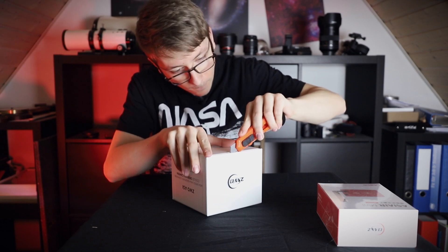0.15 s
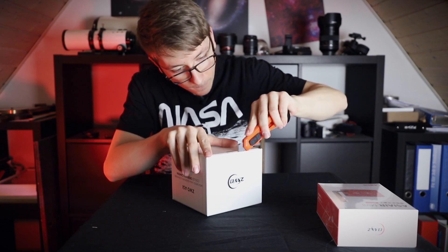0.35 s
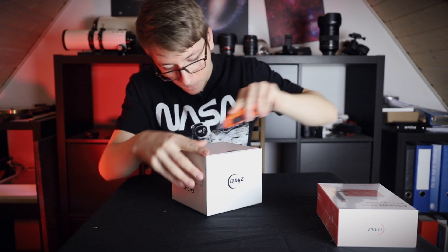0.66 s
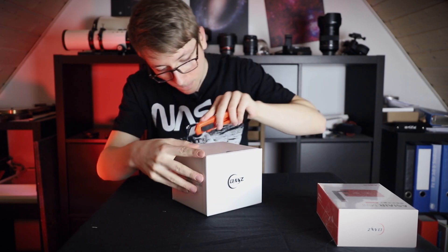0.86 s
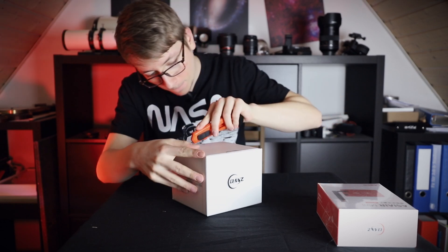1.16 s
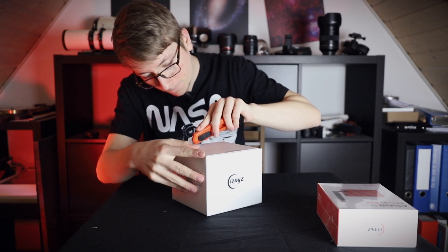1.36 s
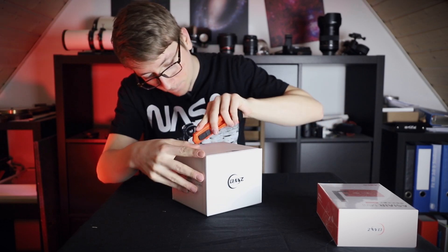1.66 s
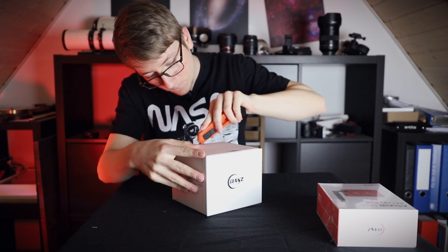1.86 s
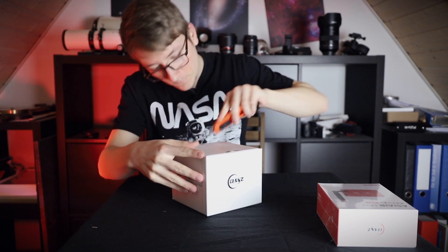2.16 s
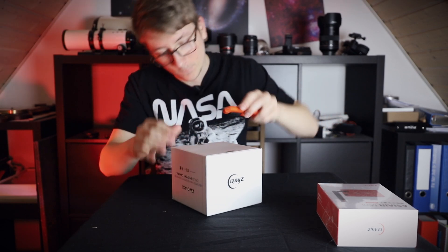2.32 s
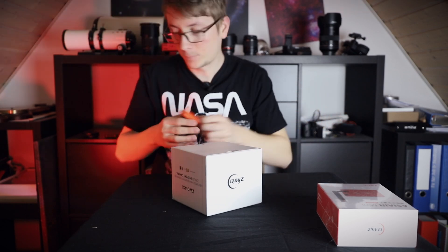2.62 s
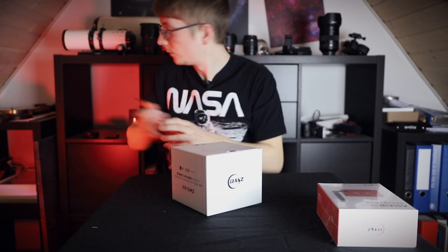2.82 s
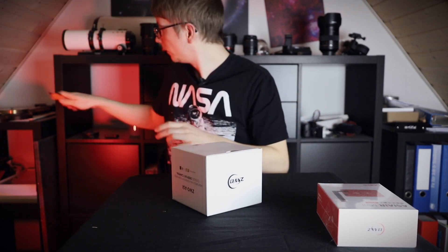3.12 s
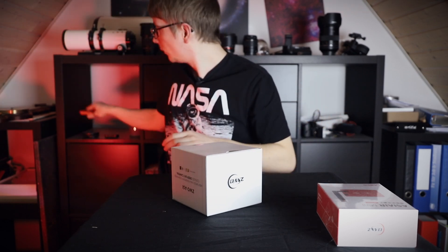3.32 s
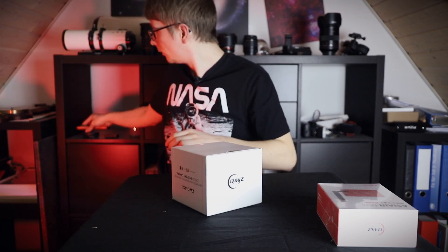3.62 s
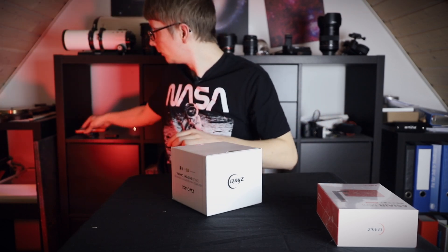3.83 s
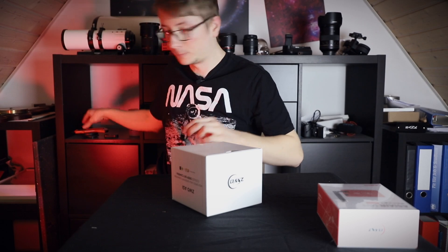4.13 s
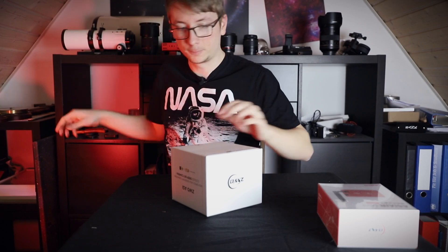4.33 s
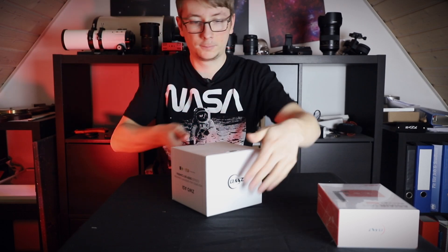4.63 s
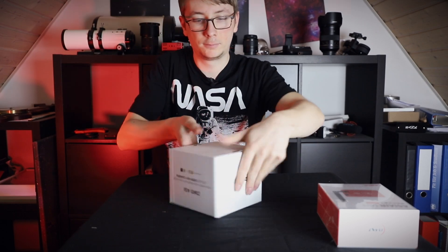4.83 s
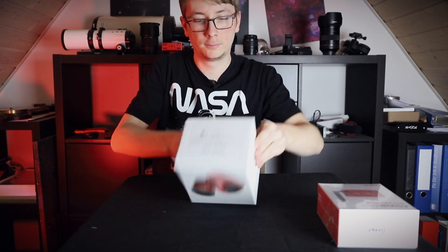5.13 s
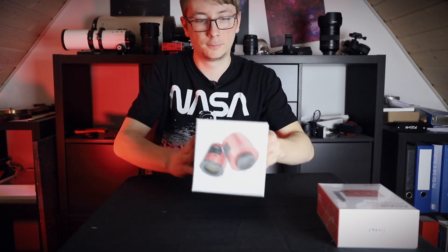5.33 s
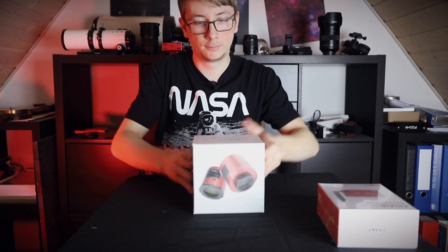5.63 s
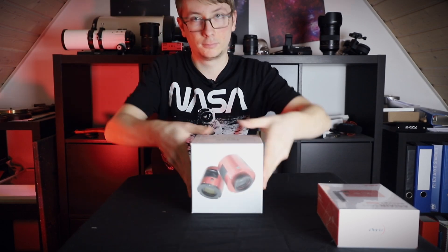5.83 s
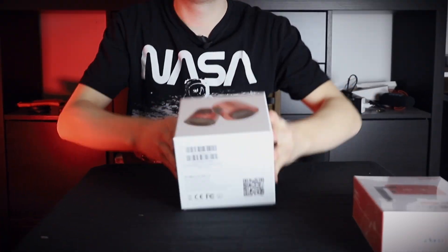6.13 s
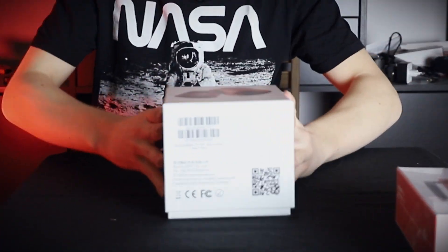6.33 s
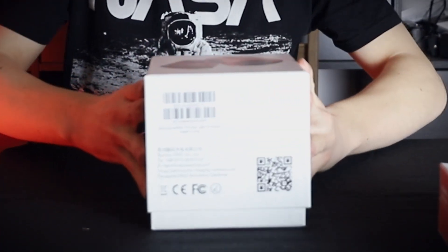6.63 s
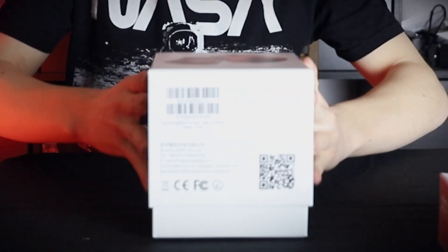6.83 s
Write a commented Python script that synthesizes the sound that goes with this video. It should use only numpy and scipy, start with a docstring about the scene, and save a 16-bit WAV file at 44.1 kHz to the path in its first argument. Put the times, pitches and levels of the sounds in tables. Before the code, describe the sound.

For the first two seconds or so, a utility knife scratches faintly through the seal of a stiff cardboard box, with short sharp skids and several hollow taps. From about 2.4 to 2.7 seconds the blade retracts in four dry clicks. A shirt then rustles and flicks softly against the clip-on microphone, returning on and off. Around 3.8 seconds the plastic knife lands on a shelf with a loud, quick, bouncing clatter. From 4.9 seconds the box is tipped over in hollow knocks, loudest around 5.2, with another thump at 5.6 and faint fingertip squeaks. More knocks and palm rubs come between 6 and 6.4 seconds as the tight lid starts moving in small, chirping jerks. From 6.5 seconds it slides with a papery hiss that turns into a rough, wavering, rising squeak until about 7 seconds. The room is small and quiet.

```python
"""Opening a cardboard box

A utility knife scratches through the seal, clicks shut and clatters onto a shelf. The stiff box is
knocked and tipped over, each impact exciting its walls and hollow body. Its tight lid slides up with a
hiss of friction that turns into a stick-slip squeak. A clip-on microphone hears it all in a small
room, with a shirt rustling against it."""
import sys
import numpy as np
from scipy import signal
from scipy.fft import rfft, irfft, next_fast_len
from scipy.io import wavfile
from scipy.ndimage import map_coordinates

SR = 44100
rng = np.random.default_rng(int(sys.argv[2]) if len(sys.argv) > 2 else 0)


def dump(signal):
    """Clip the signal to [-1, 1] and save it as 16-bit WAV at the path in sys.argv[1]."""
    limited = np.clip(np.atleast_2d(signal).T, -1, 1)
    pcm = np.round(limited * 32767).astype(np.int16)
    wavfile.write(sys.argv[1], SR, pcm)


N = 307377
TIME = np.arange(N) / SR
AGE = np.arange(SR // 3) / SR  # seconds since an impact
TOP_HZ = 15900  # band limit


# Blows on the box: start_s, level_db, pitch_hz, relative_crack_db, cycles_to_peak
BOX_BLOWS = [(0.061, -18.5, 260, -15, 0.77), (0.366, -33.5, 285, -21, 0.78), (0.432, -26, 298, -17.5, 0.96),
             (0.582, -30, 417, -11.5, 0.68), (0.801, -17, 466, 1.5, 0.59), (0.996, -36.5, 266, -14, 1.13),
             (1.429, -38, 268, -3.5, 1.43), (1.744, -26, 287, 0.5, 1.06), (2.032, -32.5, 270, -15, 0.77),
             (2.086, -16, 286, -15, 0.82), (2.924, -40, 242, 2.5, 0.85), (4.194, -31, 260, -23, 0.53),
             (4.904, -29, 125, -8.5, 0.61), (4.933, -21.5, 430, -19, 0.78), (4.96, -16, 222, -8.5, 0.96),
             (5.029, -14, 394, -19.5, 0.95), (5.168, -15, 416, -14, 1.1), (5.214, -6.5, 646, -14.5, 1),
             (5.221, -5, 500, -19.5, 0.78), (5.239, -14, 684, -13, 0.86), (5.254, -19, 690, -3, 1.2),
             (5.267, -5.5, 600, -7.5, 0.92), (5.306, -13, 660, -3.5, 0.98), (5.56, -13.5, 303, -17, .6),
             (5.565, -17.5, 153, -8, 0.78), (5.98, -27, 154, -32, 0.88), (6.074, -12, 283, -5.5, .7),
             (6.088, -31, 243, 6.5, 1), (6.13, -24, 690, 4.5, 0.54), (6.254, -17, 670, -25, 0.65),
             (6.283, -13.5, 258, -17, 0.41), (6.294, -13.5, 232, -14.5, 0.65), (6.432, -15, 180, -10, .7),
             (6.842, -33.5, 295, -5, 0.74), (6.881, -28.5, 288, -10, 0.6)]
# Modes of the hollow box: pitch_hz, level_db, t60_s
BOX_MODES = [(214.3, -14, 0.33), (352, -2, 0.23), (462.4, 6.5, 0.091), (640, -2.5, 0.061), (804, 3, 0.054),
             (1043, -10.5, 0.18), (1383, -19, 0.21)]
# Spectrum of the contact: frequency_hz, density_db
CRACK_SPECTRUM = [(100, -42.5), (500, 15), (1200, -2), (2500, -13), (10000, -32), (16000, -42)]

def box_knocks(crack_t60_s_per_cycle=0.025, ring_db=-23, partial_db=-14):
    """Impact excitation: the contact cracks, a wall flexes for a few cycles and the box rings on."""
    track = np.zeros(N)
    for start_s, db, hz, crack_db, cycles in BOX_BLOWS:
        progress = AGE * hz / cycles
        swell = progress ** 2 * np.exp(2 * (1 - progress))
        phase = 2 * np.pi * hz * AGE
        flex = swell * (np.sin(phase) + amp(partial_db) * np.sin(1.598 * phase))
        body_gain = amp(ring_db + np.log2(cycles))  # 1 dB more per doubling of the cycles
        body = body_gain * ring(BOX_MODES) * attack(0.0015)
        crack = amp(crack_db + 5.5) * burst(CRACK_SPECTRUM, t60_s=crack_t60_s_per_cycle * cycles)
        blow = flex + body + crack
        add(track, start_s + 0.00102, amp(db) * (blow + amp(-8.5) * room(blow)))
    return track


# Slip rate of the lid's wall, sagging twice as it binds: time_s, rate_hz
WALL_RATE = [(6.55, 700), (6.61, 930), (6.66, 1120), (6.69, 900), (6.708, 600), (6.73, 660), (6.762, 1700),
             (6.785, 1530), (6.815, 1920), (6.857, 2650), (6.885, 2400), (6.91, 2280), (6.93, 1400),
             (6.945, 1100), (6.97, 1550)]
# Slip rate of the lid's edge, set by the speed of the pull: time_s, rate_hz
EDGE_RATE = [(6.55, 710), (6.66, 1070), (6.72, 1300), (6.76, 1320), (6.80, 1680), (6.85, 2050),
             (6.90, 2250), (6.93, 1850), (6.97, 2460)]
# Resonances of the wall and of the edge: frequency_hz, gain_db
WALL_SPECTRUM = [(300, -15), (700, 6.5), (1500, -4), (2500, -2), (3300, -4), (5200, -9), (6500, -6),
                 (8500, -20), (10300, 1.5), (11500, -1), (12800, 3.5), (16000, -3)]
EDGE_SPECTRUM = [(1000, -16), (2200, 0.5), (3600, 5), (4500, 6), (5400, 4), (6400, -5), (8800, 0.5),
                 (10300, -14), (11500, -2), (13000, -5), (14500, -14)]
SLIP_REFERENCE_HZ = 1000

def lid_squeak(start_s=6.54, rise_s=0.098, wall_db_per_octave=5.5, edge_db_per_octave=1):
    """Stick-slip oscillation: wall and edge each squeak at their own rate, louder as it rises."""
    wall_hz = np.interp(TIME, *np.transpose(WALL_RATE))
    edge_hz = np.interp(TIME, *np.transpose(EDGE_RATE))
    tug_db = 2 * np.exp(-((TIME - 6.855) / 0.023) ** 2)  # the hardest pull presses on the wall
    wall_db = -35.5 + wall_db_per_octave * np.log2(wall_hz / SLIP_REFERENCE_HZ) + tug_db
    edge_db = -32.5 + edge_db_per_octave * np.log2(edge_hz / SLIP_REFERENCE_HZ)
    wall = amp(wall_db) * stick_slip(wall_hz, WALL_SPECTRUM, jitter=0.034, wander=0.025)
    edge = amp(edge_db) * stick_slip(edge_hz, EDGE_SPECTRUM, jitter=0.032, wander=0.04)
    return (wall + edge) * np.clip((TIME - start_s) / rise_s, 0, 1)


def stick_slip(rate_hz, spectrum, jitter, wander):
    """Relaxation oscillation: one slightly irregular pulse per slip, the grip coming and going."""
    hz = rate_hz * (1 + jitter * wobble(1200) + wander * wobble(110))
    phase = 2 * np.pi * np.cumsum(hz) / SR
    pulses = sum(np.cos(k * phase) * (k * hz < TOP_HZ) for k in range(1, 15))
    grip = amp(3 * wobble(100) + 2 * wobble(500))
    return unit(colour(pulses, spectrum) * grip) * np.sqrt(np.abs(hz) / rate_hz[0])


# The lid rises in jerks, then one long pull: start_s, length_s, level_db, rise_s
LID_PULLS = [(6.243, 0.248, -43.5, 0.014), (6.358, 0.074, -31, 0.0145), (6.484, 0.019, -37, 0.0079),
             (6.485, 0.68, -30, 0.088)]
# Spectrum of card sliding on card: frequency_hz, gain_db
SLIDE_SPECTRUM = [(150, -16), (600, -2), (1300, -5), (2200, 9.5), (4300, 5.5), (6000, 4), (8500, 8),
                  (12500, 4), (16000, 5.5)]

def lid_hiss(db_per_octave=-5):
    """Sliding friction: rough spots collide in a hiss that gives way as the squeak's pitch climbs."""
    rasp = colour(grains(rate_hz=12000, spread_db=-1), SLIDE_SPECTRUM)
    # a reflection between lid and box wall arrives a moment later, giving the spectrum a drifting ripple
    lag_s = 0.001 * (1 + 0.12 * wobble(30))
    reflection = map_coordinates(rasp, [(TIME - lag_s) * SR])
    motion = sum(amp(db) * push(start_s, length_s, rise_s, stop_s=0.0054)
                 for start_s, length_s, db, rise_s in LID_PULLS)
    edge_hz = np.interp(TIME, *np.transpose(EDGE_RATE))
    octaves_above = np.maximum(np.log2(edge_hz / SLIP_REFERENCE_HZ), 0)
    return motion * unit(rasp + reflection / 2) * amp(db_per_octave * octaves_above)


# A tight corner of the lid breaks free: start_s, level_db, length_s
CORNER_SLIPS = [(6.258, -28.5, 0.0072), (6.269, -25.5, 0.0055), (6.278, -28.5, 0.0114),
                (6.316, -37, 0.0045), (6.328, -36, 0.011)]
# Spectrum of a brief slip on card: frequency_hz, density_db
CHIRP_SPECTRUM = [(3000, -14), (7000, -19), (8800, -2), (10000, -1.5), (11400, -2), (12500, -9),
                  (16000, -10.5)]

def corner_chirps():
    """Release of static friction: each slip of the corner is a short burst of high noise."""
    gain = sum(amp(db) * push(start_s, length_s, rise_s=0.0011, stop_s=0.00098)
               for start_s, db, length_s in CORNER_SLIPS)
    return gain * noise(CHIRP_SPECTRUM, N)


# The plastic knife bounces on the shelf: start_s, level_db, relative_tick_db
KNIFE_BOUNCES = [(3.783, -22, -22), (3.838, -11, -5.5), (3.8456, -5, -12), (3.8485, -2, -34),
                 (3.8564, -21, -18), (3.8967, -9, -8), (3.8995, -14.5, -17), (3.923, -11.5, -7),
                 (3.9433, -10, -3.5), (3.9611, -11.5, -13), (3.976, -15, -16), (4.0526, -29, -21)]
# Modes of the knife on the shelf: pitch_hz, level_db, t60_s
KNIFE_MODES = [(115, -12.5, 0.55), (232, 2, 0.21), (2040, 9, 0.052), (2883, 18.5, 0.026), (3884, 9, 0.03),
               (9000, 5, .04)]
# Spectra of the shelf's thud and a hard corner's tick: frequency_hz, density_db
SHELF_SPECTRUM = [(50, -47), (100, -15), (220, 11.5), (400, -19), (620, 2.5), (1100, 1.5), (1600, -6.5),
                  (2100, 1), (2950, 6.5), (4200, -3), (5200, -16), (9700, -20), (16000, -40)]
TICK_SPECTRUM = [(2000, -18), (6000, -3), (9500, -2.5), (13500, -15), (16000, -35)]

def knife_clatter(contact_t60_s=0.03):
    """Repeated impact: each bounce thuds and rings the handle, far enough off to fill the room."""
    track = np.zeros(N)
    for start_s, db, tick_db in KNIFE_BOUNCES:
        thud = burst(SHELF_SPECTRUM, contact_t60_s)
        tick = amp(tick_db + 1) * burst(TICK_SPECTRUM, contact_t60_s)
        clack = (amp(-6) * (thud + tick) + amp(-28.5) * ring(KNIFE_MODES)) * attack(0.0016)
        add(track, start_s, amp(db) * (clack + amp(-4) * room(clack)))
    return track


# The blade catches and skids: start_s, level_db, length_s, relative_steel_db
BLADE_SKIDS = [(.022, -33.5, 0.0024, 1), (0.048, -35.5, 0.019, -13), (0.422, -54, 0.017, 1.5),
               (0.68, -54.5, 0.007, -17), (1.256, -41, 0.0054, -9), (1.351, -23, 0.0047, 5.5),
               (1.522, -40, 0.0039, 3.5), (1.661, -44.5, 0.0012, 4.5), (1.7352, -28.5, 0.012, -9),
               (2.085, -29.5, 0.0019, -23), (2.201, -50.5, 0.01, -3)]
# Spectra of the tearing seal and the ringing steel: frequency_hz, density_db
TEAR_SPECTRUM = [(150, -51), (600, -8.5), (1200, 2.5), (1900, 12.5), (2800, 2.5), (4200, -4), (5400, 3),
                 (7000, -1.5), (9000, -2.5), (13000, -3.5), (16000, -16)]
STEEL_SPECTRUM = [(3000, -17), (9500, -23), (10900, -10), (11600, 0), (12300, -7), (13400, -22),
                  (16000, -33)]

def blade_skids():
    """Fracture noise: each short skid tears the seal and excites the blade's high resonance."""
    track = np.zeros(N)
    for start_s, db, length_s, steel_db in BLADE_SKIDS:
        stroke = attack(0.0005) * np.exp(-np.maximum(AGE - length_s, 0) / 0.0015)
        tear = stroke * noise(TEAR_SPECTRUM, len(AGE))
        steel = amp(steel_db) * stroke * noise(STEEL_SPECTRUM, len(AGE))
        add(track, start_s, amp(db) * (tear + steel + amp(-8) * room(tear + 0.22 * steel)))
    return track


# Strokes along the seal's near and far ends: peak_s, level_db, length_s
NEAR_STROKES = [(.26, -51.5, 0.12), (.34, -51, 0.16), (.54, -58, 0.1)]
FAR_STROKES = [(1.96, -52.5, .3), (2.08, -47.5, 0.16), (2.22, -60.5, 0.18)]
# Resonances of the seam at each end: frequency_hz, gain_db
NEAR_SPECTRUM = [(900, -5), (1900, 9.5), (2600, 6), (3500, -3), (4400, 0.5), (5100, -10), (6000, -1),
                 (6700, -8), (7500, 0), (8100, -12), (9100, 3), (10400, -16), (11700, -2), (14000, -22)]
FAR_SPECTRUM = [(900, -19), (1800, 7.5), (2900, 4.5), (3600, -5), (4300, -2), (5000, -11), (5900, -4),
                (9000, -15), (10500, -4), (11400, 1), (12300, -7), (15000, -19)]

def blade_drag(strokes, spectrum, drift_octaves=0.012):
    """Resonant filtering: the fine grit of cutting tape excites the seam's drifting resonances."""
    speed = 2 ** (drift_octaves * wobble(15))
    rasp = colour(grains(rate_hz=9000, spread_db=3), spectrum)
    drifting = map_coordinates(rasp, [np.cumsum(speed)], order=5, mode="wrap")
    return swells(strokes, rise_share=0.43) * drifting


# The slider passes its notches: start_s, level_db
SLIDER_NOTCHES = [(2.411, -32), (2.541, -21), (2.569, -24.5), (2.73, -32)]
# Spectrum of the handle's click: frequency_hz, density_db
CLICK_SPECTRUM = [(1200, -12.5), (2500, -4.5), (3150, 9), (3900, -11), (4400, 2), (5000, -8), (5700, 2),
                  (7000, -12), (13000, -14), (15000, -24)]

def slider_clicks():
    """Damped transients: as the blade is drawn in, each notch snaps drily in the handle."""
    track = np.zeros(N)
    for start_s, db in SLIDER_NOTCHES:
        click = burst(CLICK_SPECTRUM, t60_s=0.015)
        add(track, start_s, amp(db - 7) * (click + amp(-7) * room(click)))
    return track


# Palms take hold and slide on the card: peak_s, level_db, length_s
PALM_GRIPS = [(1.19, -51.5, 0.039), (2.893, -42.5, 0.013), (2.935, -42, 0.031), (4.78, -49, 0.056),
              (5.87, -48.5, 0.031), (5.995, -47, 0.082), (6.085, -29.5, 0.046), (6.24, -44.5, 0.088),
              (6.288, -37, 0.069), (6.44, -44.5, 0.15)]
# Spectrum of skin on card: frequency_hz, gain_db
PALM_SPECTRUM = [(50, -7), (110, -4), (220, 5.5), (450, -0.5), (1000, -4), (2200, -11.5), (10000, -45)]

def palm_rubs(cutoff_hz=4000):
    """Friction at a soft contact: skin yields, so the lumpy rubbing has little treble."""
    catches = grains(rate_hz=2000, spread_db=3)
    softened = signal.sosfilt(signal.butter(2, cutoff_hz, "lowpass", fs=SR, output="sos"), catches)
    rub = swells(PALM_GRIPS, rise_share=0.17) * colour(softened, PALM_SPECTRUM)
    return amp(8) * (rub + amp(-12) * room(rub))


# Fingertips slip on the glossy card: start_s, level_db, length_s, pitch_hz
FINGER_SLIPS = [(5.162, -49, 0.033, 9750), (5.678, -42.5, .006, 10300), (5.737, -53, 0.036, 3460)]

def finger_squeaks(jitter_hz=220, overtone_db=-0.5, hiss_db=-4):
    """Stick-slip of skin: an unsteady slip rate gives a thin, rough tone in a puff of hiss."""
    track = np.zeros(N)
    hiss = amp(hiss_db) * noise(CHIRP_SPECTRUM, N)
    for start_s, db, length_s, hz in FINGER_SLIPS:
        phase = 2 * np.pi * np.cumsum(hz + jitter_hz * wobble(1500)) / SR
        tone = np.sin(phase) + amp(overtone_db) * np.sin(2 * phase) * (2 * hz < TOP_HZ)
        track += amp(db) * push(start_s, length_s, rise_s=0.001, stop_s=0.0034) * (tone + hiss)
    return track


# Arm movements rub the shirt on the microphone: peak_s, level_db, length_s
SHIRT_RUBS = [(.605, -53.5, 0.29), (2.9, -48, 0.23), (3.18, -45, 0.15), (3.33, -44, 0.16),
              (3.49, -44.5, 0.2), (3.57, -47.5, 0.062), (4.06, -42.5, 0.22), (4.26, -48.5, 0.2),
              (4.69, -41.5, 0.13), (4.875, -39.5, 0.062), (4.975, -41.5, 0.15), (5.15, -47.5, 0.47),
              (5.688, -49.5, 0.098), (6.11, -45, 0.23), (6.21, -45, 0.074)]
# Folds flick the microphone: start_s, level_db
FOLD_FLICKS = [(2.912, -18.5), (3.179, -19), (3.472, -18.5), (3.4887, -15), (3.5018, -20.5), (3.5678, -20),
               (4.0406, -19.5), (4.058, -29), (4.6164, -22), (4.709, -21), (4.8, -21.5), (4.87, -17),
               (4.904, -17), (4.95, -27), (5.8737, -26), (6.1769, -13)]
# Spectrum of cloth on the microphone: frequency_hz, gain_db
CLOTH_SPECTRUM = [(59, -41), (100, 7), (266, -13.5), (315, 1), (1330, -1.5), (2690, 1.5), (3860, -4),
                  (6990, 0), (12900, -4.5), (16000, -2.5)]

def shirt_rustle():
    """Contact noise: fibres crackle on the microphone in uneven surges, and folds flick it."""
    fibres = grains(rate_hz=8000, spread_db=3.5) + amp(-1) * grains(rate_hz=260, spread_db=4.2)
    surges = amp(3 * wobble(50))
    track = swells(SHIRT_RUBS, rise_share=0.63) * surges * colour(fibres, CLOTH_SPECTRUM)
    for start_s, db in FOLD_FLICKS:
        add(track, start_s, amp(db - 11) * burst(CLOTH_SPECTRUM, t60_s=0.01))
    return track


# Reverberation time of the small room: frequency_hz, t60_s
ROOM_DECAY = [(100, 0.57), (500, 0.37), (3000, 0.45), (7000, 0.3), (12000, 0.24)]

def room(x, delay_s=0.006, early_db=7, early_s=0.0099):
    """Reverberation: dense early reflections, then a diffuse tail whose treble dies first."""
    hz, seconds, bands = signal.stft(rng.standard_normal(SR // 2), SR, nperseg=256)
    decay = amp(-60 * seconds / along(ROOM_DECAY, hz)[:, None])
    tail = signal.istft(bands * decay, SR, nperseg=256)[1]
    tail *= 1 + amp(early_db) * np.exp(-np.arange(len(tail)) / SR / early_s)
    response = np.pad(tail / np.linalg.norm(tail), (round(delay_s * SR), 0))
    return signal.fftconvolve(x, response)[:len(x)]


# Spectra of the quiet room and the preamplifier: frequency_hz, density_db
AMBIENT_SPECTRUM = [(15, -33), (25, 9.5), (70, 1.5), (223, 1), (734, -9), (1700, -10.5), (2610, -12.5),
                    (4610, -20.5), (9570, -20), (12200, -16), (16000, -21)]
PREAMP_SPECTRUM = [(15, -37), (25, 14.5), (261, -3.5), (1510, -19.5), (11400, -11), (15800, -15)]

def noise_floor(ambient_db=-56.5, preamp_db=-68.5):
    """Stationary noise: both channels share the room's hush, and each has its own electronic hiss."""
    ambient = amp(ambient_db) * noise(AMBIENT_SPECTRUM, N)
    return np.array([ambient + amp(preamp_db) * noise(PREAMP_SPECTRUM, N) for channel in range(2)])


def amp(db):
    """Decibels to amplitude ratio."""
    return 10 ** (np.asarray(db) / 20)


def unit(x):
    """Normalisation to rms 1."""
    return x / np.sqrt(np.mean(x ** 2) + 1e-20)


def along(points, hz):
    """Interpolation of (frequency_hz, value) points on a logarithmic frequency axis."""
    frequencies, values = np.transpose(points)
    return np.interp(np.log(hz + 1), np.log(frequencies + 1), values)


def wobble(rate_hz):
    """Random modulation: a smooth curve through rate_hz random values a second."""
    return map_coordinates(rng.standard_normal(int(N * rate_hz / SR) + 4), [TIME * rate_hz])


def colour(x, spectrum):
    """Minimum-phase filtering by the given spectrum; the result has rms 1."""
    size = 2 * next_fast_len(len(x) // 2 + 2048)
    gain = amp(along(spectrum, np.fft.rfftfreq(size, 1 / SR)))
    cepstrum = irfft(np.log(gain))
    cepstrum[1:size // 2] *= 2  # folding onto positive time makes the filter causal
    cepstrum[size // 2 + 1:] = 0
    return unit(irfft(rfft(x, size) * np.exp(rfft(cepstrum)))[:len(x)])


def noise(spectrum, size):
    """Coloured Gaussian noise of rms 1."""
    return colour(rng.standard_normal(size), spectrum)


def burst(spectrum, t60_s):
    """Exponential decay: coloured noise that falls 60 dB in t60_s."""
    return noise(spectrum, len(AGE)) * amp(-60 * AGE / t60_s)


def grains(rate_hz, spread_db):
    """Shot noise: tiny fibre snaps of uneven size at random moments."""
    sizes = amp(spread_db * np.minimum(rng.exponential(size=N), 4))
    return unit((rng.random(N) < rate_hz / SR) * sizes * rng.choice([-1, 1], N))


def ring(modes):
    """Free vibration: damped modes, their strength and tuning a little different at each strike."""
    return sum(amp(db + 2 * rng.normal() - 60 * AGE / t60_s)
               * np.sin(2 * np.pi * hz * (1 + rng.normal() / 100) * AGE) for hz, db, t60_s in modes)


def attack(rise_s):
    """Onset envelope: an exponential approach to 1."""
    return 1 - np.exp(-AGE / rise_s)


def swells(rubs, rise_share):
    """Incoherent addition: the joint gain of rubs that each grow and die away exponentially."""
    power = np.zeros(N)
    for peak_s, db, length_s in rubs:
        distance_s = np.maximum((peak_s - TIME) / rise_share, (TIME - peak_s) / (1 - rise_share))
        power += amp(db) ** 2 * np.exp(-2 * distance_s / length_s)
    return np.sqrt(power)


def push(start_s, length_s, rise_s, stop_s):
    """Envelope of one slide: linear rise, hold, exponential release."""
    release = np.exp(-np.maximum(TIME - start_s - length_s, 0) / stop_s)
    return np.clip((TIME - start_s) / rise_s, 0, 1) * release


def add(track, start_s, sound):
    """Superposition of a sound on the track at start_s."""
    start = max(round(start_s * SR), 0)
    track[start:start + len(sound)] += sound[:N - start]


def scene():
    """Superposition: all sources sum at one microphone, alike in both channels, over the noise floor."""
    box = box_knocks() + lid_squeak() + lid_hiss() + corner_chirps()
    cuts = blade_drag(NEAR_STROKES, NEAR_SPECTRUM) + blade_drag(FAR_STROKES, FAR_SPECTRUM)
    knife = knife_clatter() + blade_skids() + cuts + slider_clicks()
    handling = palm_rubs() + finger_squeaks() + shirt_rustle()
    return box + knife + handling + noise_floor()


def record(dry, low_cut_hz=65):
    """Band limiting: the microphone rolls off the deep bass, and nothing above TOP_HZ is kept."""
    thinned = signal.sosfilt(signal.butter(2, low_cut_hz, "highpass", fs=SR, output="sos"), dry)
    size = next_fast_len(N + SR // 2)
    passband = np.fft.rfftfreq(size, 1 / SR) < TOP_HZ
    return irfft(rfft(thinned, size) * passband, size)[:, :N]


dry = scene()
out = record(dry)
dump(out)
```